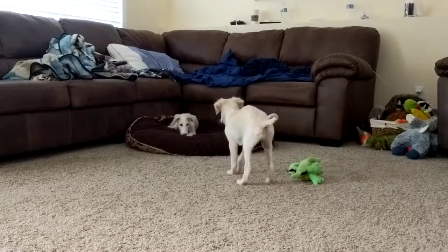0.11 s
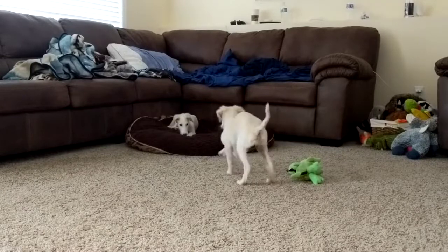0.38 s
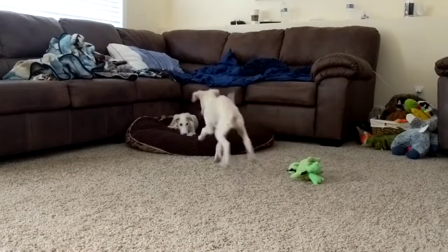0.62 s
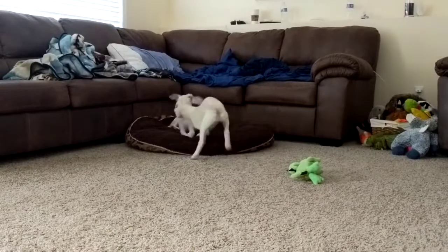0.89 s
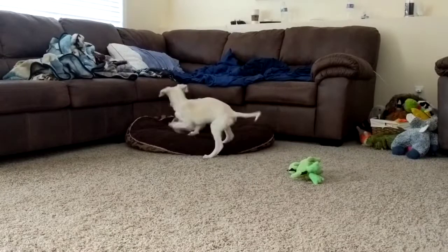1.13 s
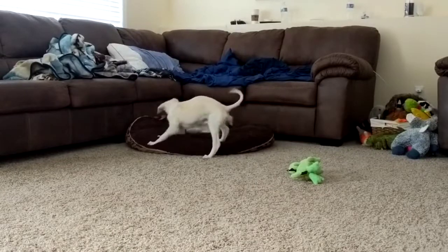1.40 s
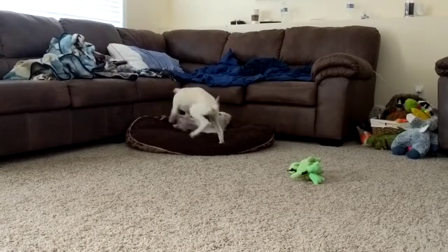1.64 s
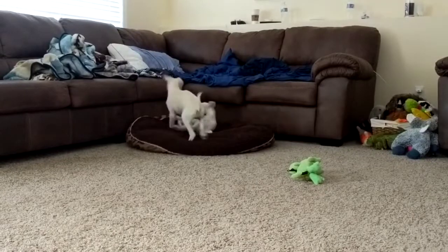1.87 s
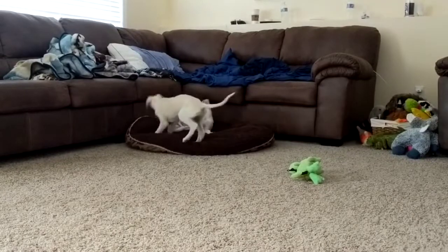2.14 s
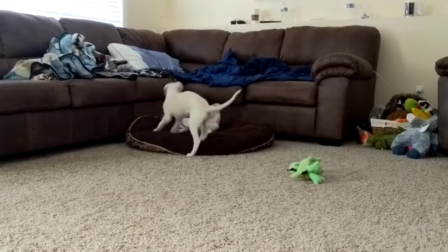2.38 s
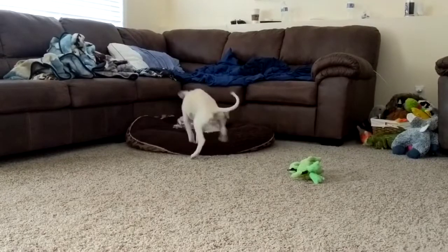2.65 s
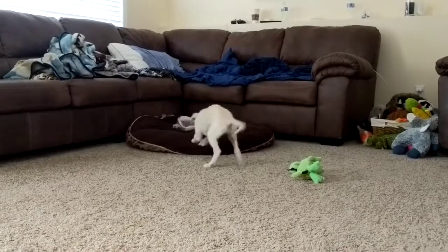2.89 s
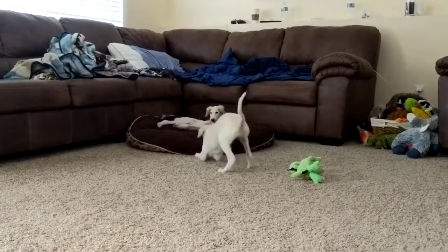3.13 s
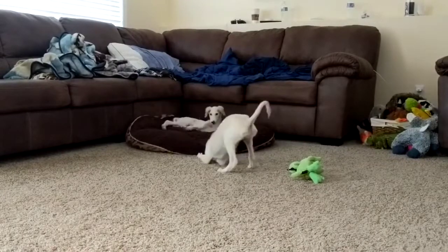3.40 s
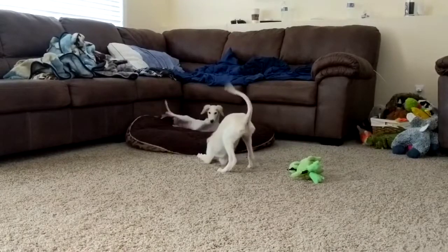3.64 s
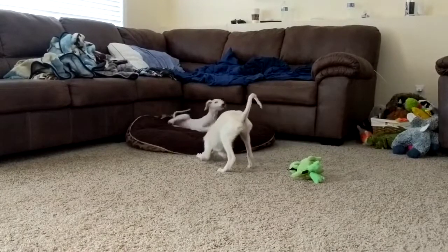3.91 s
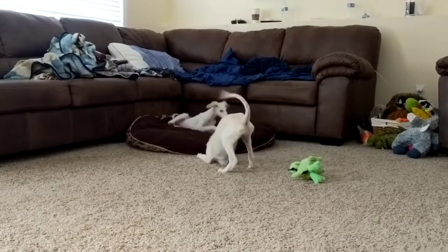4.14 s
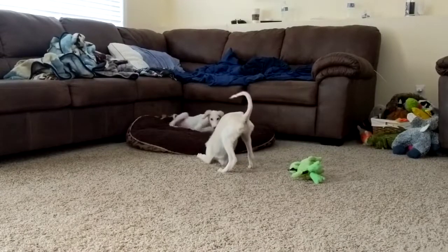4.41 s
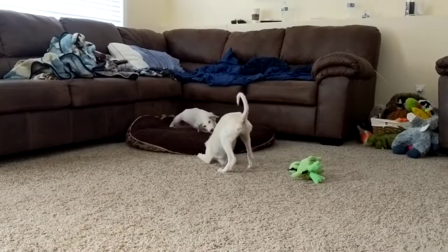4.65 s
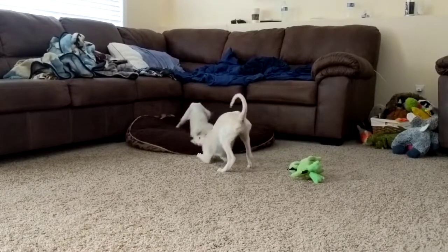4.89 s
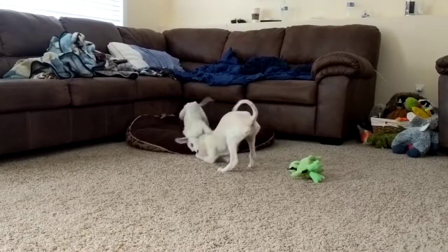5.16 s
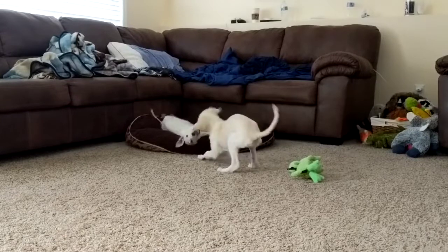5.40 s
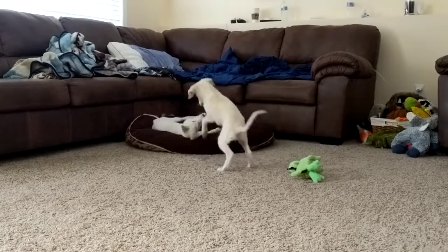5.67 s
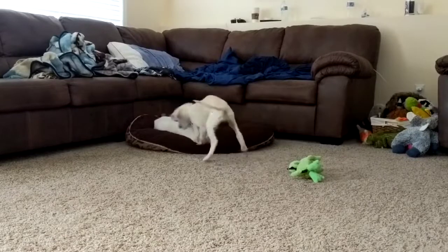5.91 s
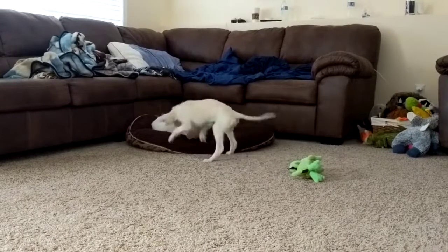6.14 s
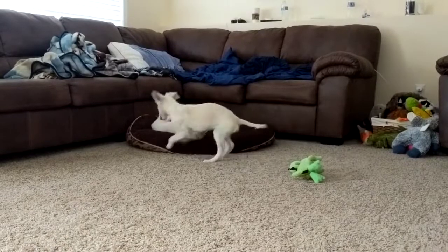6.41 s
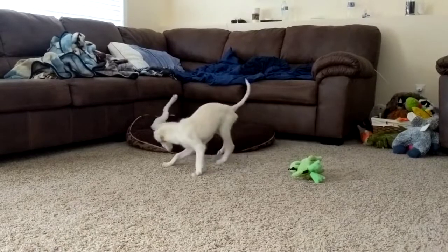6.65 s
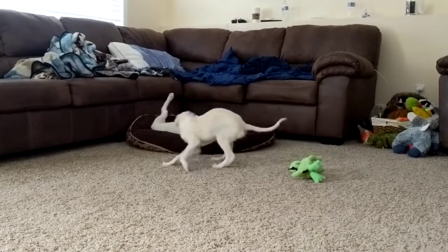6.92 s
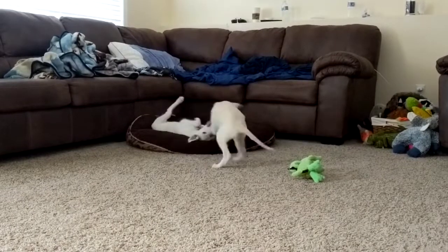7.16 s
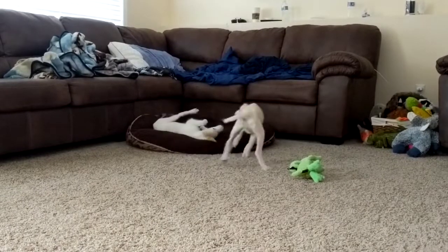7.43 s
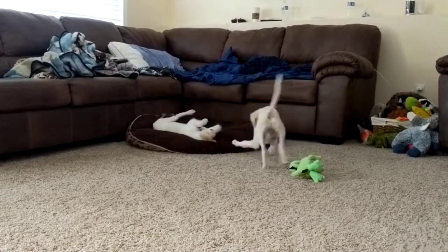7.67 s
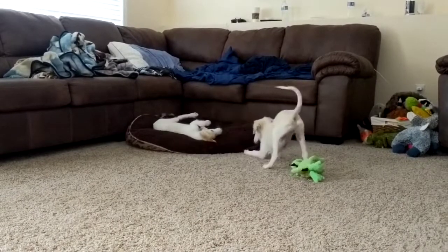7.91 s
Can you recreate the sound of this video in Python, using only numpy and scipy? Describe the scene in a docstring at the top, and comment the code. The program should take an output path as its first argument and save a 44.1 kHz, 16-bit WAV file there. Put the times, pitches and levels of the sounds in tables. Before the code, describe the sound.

Low raspy puppy growls and sharp barks, the first three cracking into high yelps, with soft paw thuds and rubbing over a quiet house hum.

```python
"""A carpeted living room: two puppies play-fight on a dog bed, a few metres from a small microphone.
Growls: fold pulses and air boom low in the chest and ring a part-open mouth; barks open it wide, hoarsely.
Three barks break into a clear yelp of four harmonics. Paw thuds are sagging sines with a puff of noise;
scuffles are clumped cloth noise. Beneath lie a coloured hush and a low, wavering house hum."""
import sys
import numpy as np
from scipy import signal
from scipy.fft import rfft, irfft, next_fast_len
from scipy.io import wavfile
from scipy.ndimage import uniform_filter1d

SR = 44100
rng = np.random.default_rng(int(sys.argv[2]) if len(sys.argv) > 2 else 0)


def unload_audio(sound):
    """Save the sound as a 16-bit wav file, at the path given as the first command line argument."""
    columns = np.transpose(np.atleast_2d(sound))
    # keep every value between -1 and 1, then stretch to whole-number steps
    steps = np.round(np.clip(columns, -1, 1) * 32767)
    wavfile.write(sys.argv[1], SR, steps.astype(np.int16))


def field_ratio(decibels):
    """Amplitude ratio for a level in dB (20 dB per decade); scalars and array-likes work."""
    return 10 ** (np.asarray(decibels, dtype=float) / 20)


N = 354828


def evened(x):
    """Scales to rms 1."""
    return x / np.sqrt(np.mean(x ** 2) + 1e-20)


def read(points, hz):
    """Reads a spectrum on a log-frequency axis."""
    f, value = np.transpose(points)
    return np.interp(np.log(hz + 1), np.log(f + 1), value)


def add(mix, start_s, sound):
    """Mixes a sound in at its start time."""
    part = mix[round(start_s * SR):][:len(sound)]
    part += sound[:len(part)]


def columns(rows):
    """Spreads curve rows, time first, over samples."""
    s, *rest = np.transpose(rows)
    t = np.arange(s[0], s[-1], 1 / SR)
    return [np.interp(t, s, c) for c in rest]


def wander(count, hz):
    """Slow chance up to about hz, rms 1."""
    settle = 2000  # filter run-in, samples
    noise = rng.standard_normal(count + settle)
    return evened(signal.lfilter(*signal.butter(2, hz, fs=SR), noise)[settle:])


def resonate(x, hz, width_hz):
    """A moving resonance applied twice, for steep skirts."""
    turn = np.exp(2j * np.pi * np.cumsum(hz * np.ones(len(x))) / SR)
    r = np.exp(-np.pi * width_hz / SR)
    at_zero_hz = signal.lfilter([(1 - r) ** 2], [1, -2 * r, r * r], x / turn)
    return 2 * (turn * at_zero_hz).real


def coloured(points):
    """Steady noise of a given spectrum, rms 1."""
    size = next_fast_len(N)
    hz = np.fft.rfftfreq(size, 1 / SR)
    spectrum = rfft(rng.standard_normal(size)) * field_ratio(read(points, hz))
    return evened(irfft(spectrum, size)[:N])


def swell(u, peak_at, in_db, out_db, bend):
    """Level over a call's course u (0-1): a slowing climb to the peak, then a straight sag."""
    climb_db = in_db * np.clip(1 - u / peak_at, 0, 1) ** bend
    sag_db = out_db * np.clip((u - peak_at) / (1 - peak_at), 0, 1)
    return climb_db + sag_db


def climb(u, top_at):
    """Rises from 0 to 1, easing off, and stays."""
    return np.sin(np.pi / 2 * np.clip(u / top_at, 0, 1))


def house():
    """The hush of air and microphone, and a hum that wavers in pitch and strength."""
    # Each row: frequency in Hz, relative density in dB per Hz.
    hush_spectrum = [(12, -50), (30, -20), (65, -6.5), (95, -10.5), (140, -16.5), (320, -23), (600, -25.5),
                     (1100, -28.5), (1800, -33), (4500, -36), (6300, -39), (8000, -43.5), (16000, -46)]
    # Each row: time in seconds, hum level in dB before a slight wander.
    hum_curve = [(0.0, -79), (0.74, -68.5), (2.0, -72), (3.2, -63.5), (4.9, -66.5), (5.4, -69.5),
                 (7.6, -72.5), (8.04, -57.5)]
    hush_db, hum_hz = -66, 92
    s, db = np.transpose(hum_curve)
    hum = np.sin(2 * np.pi * np.cumsum(hum_hz * (1 + 0.028 * wander(N, 6.7))) / SR)
    hum_db = np.interp(np.arange(N) / SR, s, db) + 0.59 * wander(N, 6)
    return field_ratio(hush_db) * coloured(hush_spectrum) + field_ratio(hum_db) * hum


def thud(db, hz):
    """A paw's soft low push into padding, sagging in pitch, with a puff of cloth."""
    t = np.arange(4000) / SR
    push = np.sin(2 * np.pi * hz * t * (1 - 1.5 * t)) * np.exp(-t / 0.022)
    puff = evened(resonate(rng.standard_normal(len(t)), 370, 530)) * np.exp(-t / 0.019)
    return field_ratio(db) * (push + 0.16 * puff) * np.minimum(t / 0.016, 1)


def scuffle():
    """Paws and fur rub on cloth: noise in clumps under the envelopes of the strokes."""
    # Spectrum of the rubbing. Each row: frequency in Hz, relative density in dB per Hz.
    cloth_spectrum = [(300, -35), (700, -16), (1300, -8), (1850, 0), (2500, -7), (3600, -10), (5000, -20),
                      (10000, -40)]
    # Rubbing strokes. Each row: start in seconds, length in seconds, relative level in dB.
    strokes = [(0.81, 0.11, -79), (0.925, .06, -87), (1.003, 0.38, -82), (1.34, .14, -78), (1.5, .09, -74),
               (3.435, .46, -84), (4.76, .07, -78.5), (4.85, .17, -81), (5.023, 0.1, -71),
               (5.87, .045, -70.5), (5.914, 0.094, -67.5), (7.8, .1, -86.5), (7.915, .13, -83.5)]
    ramp_s, fade_db = 0.013, -6
    cloth = coloured(cloth_spectrum) * field_ratio(2.7 * wander(N, 70))
    envelope = np.zeros(N)
    for start_s, length_s, db in strokes:
        t = np.arange(0, length_s, 1 / SR)
        ramps = np.clip(np.minimum(t, length_s - t) / ramp_s, 0, 1)
        add(envelope, start_s, field_ratio(db + fade_db * t / length_s) * ramps)
    return envelope * cloth


def voice(start_s, hz, chest_db, mouth_db, third_db, jitter, throb_db, half_db, fill_db):
    """Fold pulses boom in the chest and, with puffs of air, ring the mouth; hoarseness unsettles them."""
    # Jaw, lips and head through the play. Each row: time in seconds, first, second and third
    # resonance in Hz, lift of the second in dB, lift of the third in dB.
    muzzle = [(1.0, 910, 1806, 3233, 0.5, 3.5), (1.7, 1021, 1914, 3210, 4.5, -2),
              (1.79, 856, 1744, 3270, 7.5, -1), (2.05, 893, 1670, 3270, 3, -1),
              (2.15, 955, 1954, 3300, 4, 2), (2.241, 917, 1633, 3250, 3.5, 2.5),
              (2.83, 960, 2006, 3290, 9, -1), (2.86, 880, 1880, 3310, 2, 1), (2.92, 839, 1700, 3286, -1, 0),
              (4.9, 897, 1780, 3480, 4.5, -4), (5.1, 1030, 1570, 3600, 0, -1),
              (5.22, 1264, 2080, 3480, 4.5, -0.5), (5.33, 1100, 2000, 3510, -5, -2),
              (5.4, 750, 1640, 3520, 3.5, -3), (5.5, 974, 2150, 3580, 0, -1.5),
              (6.1, 1020, 1830, 3350, 1, -1), (6.16, 1047, 1900, 3680, 3.5, 3.5),
              (6.22, 1005, 1840, 3060, 0.5, -4), (6.8, 995, 1635, 3510, 4.5, 4),
              (7.07, 1073, 1610, 3040, 1.5, -5), (7.35, 1013, 1935, 3640, 4, 1.5),
              (7.601, 973, 1710, 3450, -7, 0.5)]
    # Hoarseness through the play. Each row: time in seconds, roughness 0-1.
    hoarse = [(1, .5), (1.7, .6), (1.95, .3), (2.1, .3), (2.17, .6), (2.85, .6), (4.9, .55), (5.12, .55),
              (5.18, .25), (5.36, .22), (5.42, .5), (6.1, .6), (6.8, .45), (7.15, .55), (7.24, .3),
              (7.36, .18), (7.43, .4), (7.53, .25), (7.64, .45)]
    # First and second mouth resonance. Each row: width in Hz, level in dB.
    mouth_bands = [(230, 6), (330, -1.5)]
    # Faint high resonances. Each row: frequency in Hz before chance detuning, width in Hz, mean level in dB.
    upper = [(6240, 1100, -43.5), (8900, 3300, -46.5), (12300, 1900, -57)]
    # Fixed resonance under the mouth's: frequency in Hz, width in Hz, level in dB.
    throat_hz, throat_width_hz, throat_db = (750, 100, -3.5)
    # Edges of the wash between the resonances, in Hz.
    fill_hz = [700, 2450]
    third_width_hz, mouth_low_hz, mouth_high_hz = 800, 610, 4300

    size = len(hz)
    t = start_s + np.arange(size) / SR
    rough = np.interp(t, *np.transpose(hoarse))
    s, *shape = np.transpose(muzzle)
    low_hz, mid_hz, third_hz, lift_db, third_lift_db = (np.interp(t, s, c) for c in shape)
    turns = np.cumsum(hz * (1 + jitter * rough * wander(size, 60))) / SR
    throb = field_ratio(throb_db * rough * wander(size, 39))  # the folds catch harder and softer

    chest = sum(field_ratio(db) * np.cos(2 * np.pi * k * turns) for k, db in ((1, 2.5), (2, -9.5), (3, -17)))
    # now and then strong and weak pulses alternate: a line halfway between the first harmonics
    half = field_ratio(half_db + 5.0 * wander(size, 8)) * rough
    chest = chest + half * np.cos(3 * np.pi * turns)
    folds = np.diff(np.floor(turns), prepend=0) * field_ratio(1.0 * rough * rng.standard_normal(size))
    puffs = (0.68 + np.exp(-(turns % 1) / 0.43)) * rng.standard_normal(size)
    rasp = evened(resonate(puffs, 1.4 * hz, 330))  # air low in the windpipe
    chest = chest + field_ratio(-4.0) * rough * rasp

    drive = np.sqrt(1 - rough) * folds * np.sqrt(SR / hz) + rough * evened(puffs)
    (low_width_hz, low_db), (mid_width_hz, mid_db) = mouth_bands
    mouth = field_ratio(low_db) * evened(resonate(drive, low_hz, low_width_hz))
    mouth = mouth - field_ratio(mid_db + lift_db) * evened(resonate(drive, mid_hz, mid_width_hz))
    mouth = mouth + field_ratio(throat_db) * evened(resonate(drive, throat_hz, throat_width_hz))
    # a broad wash, 420 samples late, fills in between the resonances
    fill_band = signal.butter(4, fill_hz, "band", fs=SR, output="sos")
    wash = signal.sosfilt(fill_band, np.roll(drive, 420))
    mouth = evened(mouth + field_ratio(fill_db) * evened(wash))
    third = evened(resonate(drive, third_hz, third_width_hz))
    mouth = mouth + field_ratio(third_db + third_lift_db) * third
    # the small muzzle passes little outside these limits
    mouth = signal.sosfilt(signal.butter(10, mouth_high_hz, fs=SR, output="sos"), mouth)
    mouth = signal.sosfilt(signal.butter(4, mouth_low_hz, "high", fs=SR, output="sos"), mouth)
    for f, width_hz, db in upper:
        hiss = evened(resonate(puffs, f * rng.uniform(.92, 1.05), width_hz))
        mouth = mouth + field_ratio(db + 3.0 * wander(size, 15)) * hiss

    sound = throb * (field_ratio(chest_db) * chest + field_ratio(mouth_db) * mouth)
    return start_s, sound * signal.windows.tukey(size, min(.03 * SR / size, 1))


def growl(rows):
    """Effort drives the chest; the mouth lets out more of it the wider it opens."""
    shut_db = -29.5  # mouth relative to effort at opening 0
    hz, effort_db, opening = columns(rows)
    mouth_db = effort_db + shut_db * (1 - opening)
    return voice(rows[0][0], hz, effort_db, mouth_db, third_db=-13,
                 jitter=0.098, throb_db=4.5, half_db=-1.5, fill_db=0.0)


def bark(start_s, length_s, peak_db, aim_hz, swell_db):
    """One push of air: level and pitch climb together while the jaw opens and the chest tone thins."""
    thin_hz, thin_db_per_hz, aim_db_per_hz = 310, -.08, -.06
    droop, droop_from = .1, .8  # share of pitch lost at the end, share of length where it begins
    third_open_db, third_ends_db = -7.5, -13.5  # third resonance with the jaw widest, and at both ends
    u = np.arange(0, length_s, 1 / SR) / length_s
    onset_hz = 250 - 2.5 * swell_db  # growl register, the lower the softer the start
    top_at = .4 + .013 * swell_db  # a longer swell tops out later
    hz = onset_hz + (aim_hz - onset_hz) * climb(u, top_at)
    hz = hz * (1 - droop * np.clip((u - droop_from) / (1 - droop_from), 0, 1) ** 2)
    chest_db = -50 + swell(u, 0.38, -6, 0, 0.96)
    # thins as pitch passes thin_hz, and from the start in a bark aimed higher
    chest_db = chest_db + thin_db_per_hz * np.maximum(hz - thin_hz, 0)
    chest_db = chest_db + aim_db_per_hz * max(aim_hz - thin_hz, 0)
    mouth_db = peak_db + swell(u, .68, -swell_db, -4, 2.22)
    jaw = np.sin(np.pi * u ** 1.35)
    third_db = third_open_db + (third_ends_db - third_open_db) * (1 - jaw)
    return voice(start_s, hz, chest_db, mouth_db, third_db,
                 jitter=.12, throb_db=2.0, half_db=-6.0, fill_db=2.0)


def yelp(start_s, length_s, peak_db, top_hz, overtones_db):
    """The folds jump to a high clean register: four harmonics, each overtone fluttering on its own."""
    # Second, third and fourth harmonic: relative levels in dB.
    harmonics_db = [-11, -19, -27]
    start_share, flutter_db = .92, 2.5  # starting pitch as a share of the top; overtone flutter rms
    u = np.arange(0, length_s, 1 / SR) / length_s
    hz = top_hz * (start_share + (1 - start_share) * climb(u, .45))
    turns = np.cumsum(hz * (1 + 0.017 * wander(len(hz), 95))) / SR
    tone = np.cos(2 * np.pi * turns)
    for k, db in enumerate(harmonics_db, 2):
        level_db = db + overtones_db + flutter_db * wander(len(u), 40)
        tone = tone + field_ratio(level_db) * np.cos(2 * np.pi * k * turns)
    level = field_ratio(peak_db + swell(u, .45, -14.5, -8.5, 1.7))
    return start_s, level * np.sqrt(2) * tone * signal.windows.tukey(len(hz), .3)


def room(x):
    """Sparse reflections of random sign, each band dying at its own speed."""
    # Each row: frequency in Hz, 60 dB decay time in seconds.
    decay = [(200, 0.53), (530, 0.36), (1390, 0.42), (3680, 0.38)]
    taps = np.zeros(SR)
    at = np.arange(300, SR - 20, 20)
    taps[at + rng.integers(0, 20, len(at))] = rng.choice([-1., 1.], len(at))
    hz, t, z = signal.stft(taps, SR, nperseg=256)
    fade = field_ratio(-60 * t / read(decay, hz)[:, None])
    tail = signal.istft(z * fade, SR, nperseg=256)[1]
    return signal.fftconvolve(x, tail / np.linalg.norm(tail))[:N]


def scene():
    """Dogs, direct and by way of the room, over the house."""
    # One curve a growl. Each row: time in seconds, fold pitch in Hz before jitter, effort in dB,
    # mouth opening (0 shut, 1 mouth level equal to effort, more when wide).
    growls = [
        [(0.97, 160, -64, 0.4), (1.034, 178, -54.5, 0.32), (1.114, 141.4, -59, .25),
         (1.164, 140.1, -60.5, 0.59), (1.244, 149.1, -62, 0.3), (1.316, 133, -64.5, 0.4), (1.4, 109.5, -78, 1)],
        [(1.8, 290.7, -65.5, 1.2), (1.85, 214.2, -62, 1.1), (1.9, 197.2, -53, 1), (1.97, 186.5, -55.5, 1),
         (2.01, 151.3, -57.5, 0.84), (2.058, 133.8, -59.5, .9), (2.09, 139, -46, .6)],
        [(2.27, 268, -60, 1), (2.31, 244.5, -79.5, 1.27), (2.36, 203, -77, 1.7)],
        [(2.93, 242.6, -48, 0.97), (2.97, 246.3, -71.5, 0.93), (3.06, 230.6, -76, 1.5)],
        [(4.82, 209.5, -70.5, 0.8), (4.864, 200.2, -60, 0.38), (4.956, 211.3, -69, 0.57), (4.99, 219, -62, 0.4),
         (5.044, 188.7, -59, 0.6), (5.12, 198.7, -52.5, 0.53)],
        [(5.23, 209.2, -51, .5), (5.25, 203.8, -44.5, .3), (5.322, 188.2, -49, 0.46), (5.378, 185, -48, 0.64),
         (5.4, 187, -57, 1.2)],
        [(6.05, 158.1, -65, .7), (6.082, 159.8, -53.5, 0.87), (6.11, 153, -61, 0.96), (6.15, 178, -46, 1.0)],
        [(6.25, 207, -48, 1.1), (6.275, 194.5, -55.5, 1.19), (6.305, 197, -74, 0.9), (6.34, 196, -75, 1.5)],
        [(6.73, 156.9, -55, 0.42), (6.79, 158.1, -46.5, 0.69), (6.844, 185.3, -50.5, 0.44),
         (6.946, 189.3, -50.5, 0.62), (7.004, 232.3, -52, .75), (7.075, 228, -52, 1.2), (7.12, 215, -52, .85),
         (7.156, 186, -55, 0.72), (7.218, 207.4, -48, .75), (7.3, 212, -49, .8)],
        [(7.375, 275, -46, .9), (7.4, 235, -47, 0.56), (7.438, 206.2, -51.5, 0.79), (7.49, 194.4, -48, 0.63),
         (7.548, 201.8, -56.5, 0.98), (7.626, 179.1, -54.5, 1), (7.7, 183.6, -69.5, 1.02)],
    ]
    # Each row: start in seconds, length in seconds, relative peak level in dB, pitch aimed at in Hz,
    # swell from the start in dB.
    barks = [(1.64, .15, -30.5, 465, 49.5), (2.09, .17, -33.5, 425.7, 32), (2.785, .125, -35, 418, 25),
             (5.11, .14, -44, 294, 21), (5.384, .145, -37.5, 365.2, 16), (6.139, .12, -31, 361.7, 21.5),
             (7.284, 0.11, -38.5, 322.3, 18)]
    # Each row: start in seconds, length in seconds, relative peak level in dB, top pitch in Hz before
    # jitter, overtone gain in dB.
    yelps = [(1.745, .055, -26.5, 884.7, 3.5), (2.2, 0.063, -27.5, 869, -2), (2.853, .077, -28.5, 843, -7)]
    # Paws on bed and floor. Each row: start in seconds, relative level in dB, starting pitch in Hz.
    thuds = [(0.809, -48.5, 137), (6.658, -70, 93), (7.901, -53, 330), (7.96, -54, 101), (8, -65, 80.7)]
    direct_db, room_db = 2, -2
    dogs = scuffle()
    for rows in growls:
        add(dogs, *growl(rows))
    for row in barks:
        add(dogs, *bark(*row))
    for row in yelps:
        add(dogs, *yelp(*row))
    for start_s, db, hz in thuds:
        add(dogs, start_s, thud(db, hz))
    # the dogs' sound carries no deep bass below about 75 Hz
    dogs = signal.sosfilt(signal.butter(2, 75, "high", fs=SR, output="sos"), dogs)
    return (field_ratio(direct_db) * dogs + field_ratio(room_db) * room(dogs) + house())[None]


def band_limit(x):
    """A steep low-pass at the top of the band."""
    return signal.sosfilt(signal.butter(12, 15720, fs=SR, output="sos"), x)


def record(dry):
    """Loud sound makes the recorder trim its deepest bass."""
    bass_hz, knee_db, hold_s = 55, -59, .3
    cut_db_per_db = 0.23  # bass cut for each dB over the knee
    power = abs(uniform_filter1d(dry ** 2, round(hold_s * SR)))
    power_db = 10 * np.log10(power + 1e-12)
    bass = signal.sosfiltfilt(signal.butter(3, bass_hz, fs=SR, output="sos"), dry)
    bass_gain = field_ratio(-cut_db_per_db * np.maximum(power_db - knee_db, 0))
    trimmed = dry - bass * (1 - bass_gain)
    return band_limit(trimmed)


dry = scene()
out = record(dry)
unload_audio(out)
```